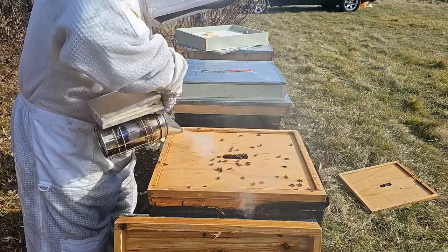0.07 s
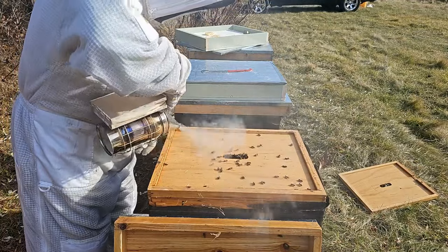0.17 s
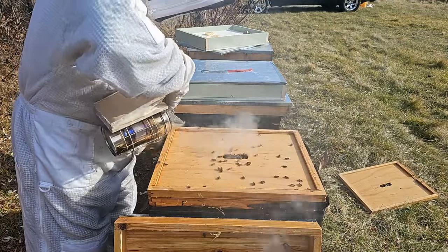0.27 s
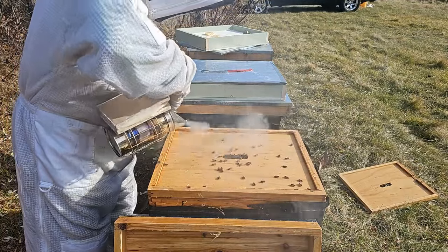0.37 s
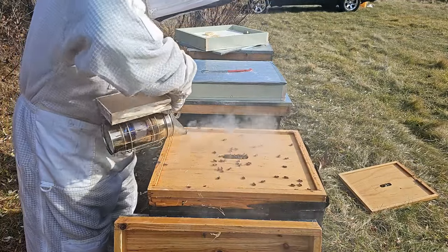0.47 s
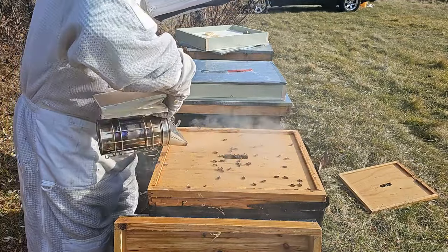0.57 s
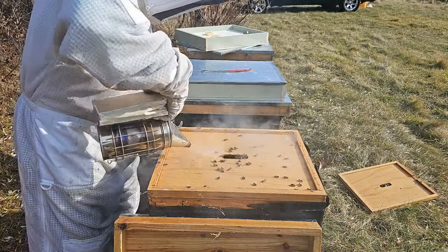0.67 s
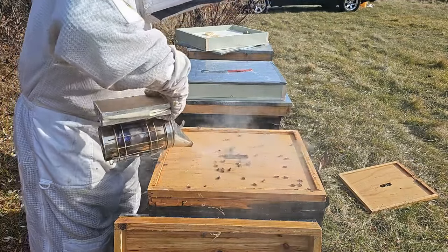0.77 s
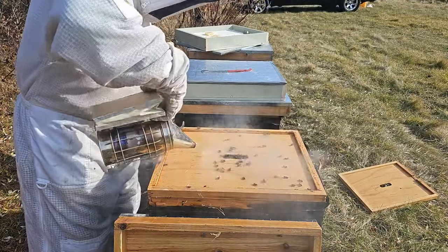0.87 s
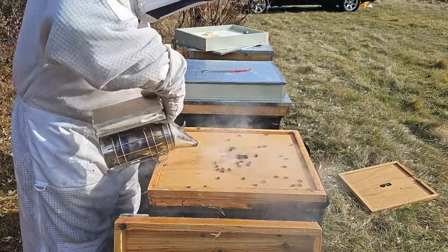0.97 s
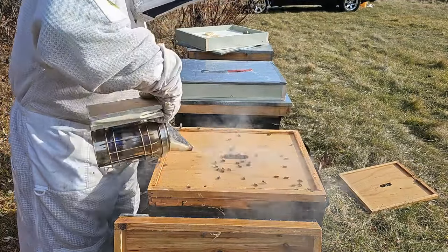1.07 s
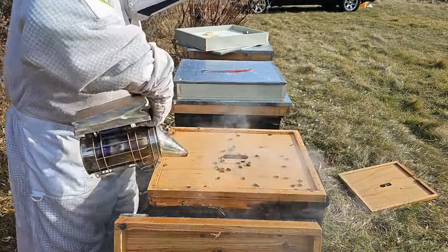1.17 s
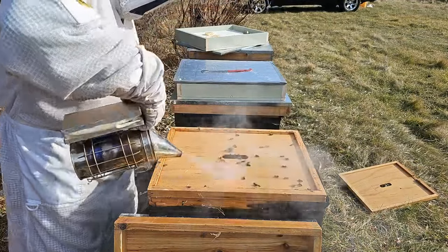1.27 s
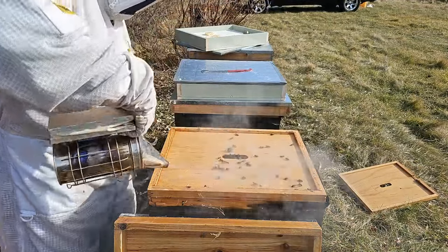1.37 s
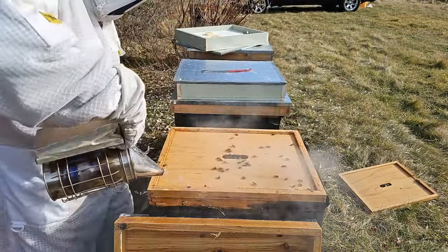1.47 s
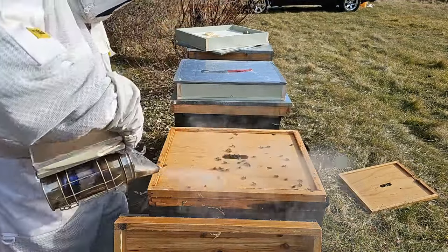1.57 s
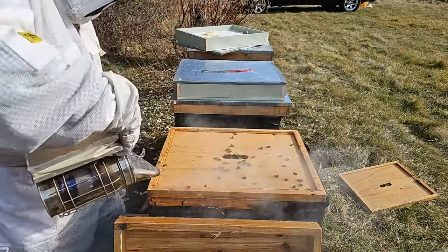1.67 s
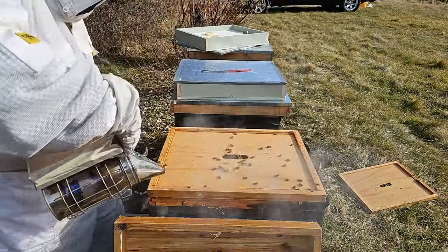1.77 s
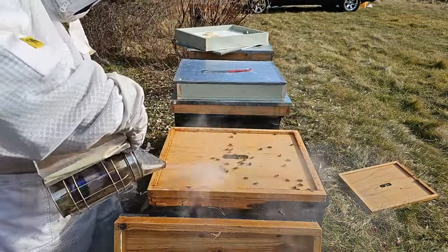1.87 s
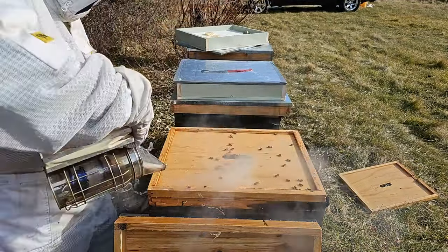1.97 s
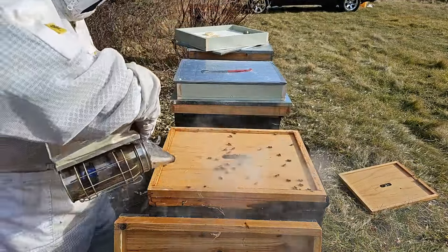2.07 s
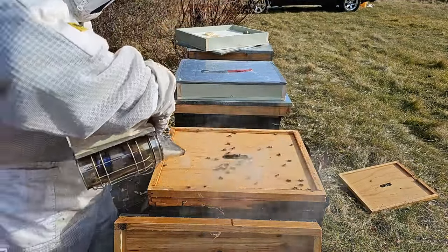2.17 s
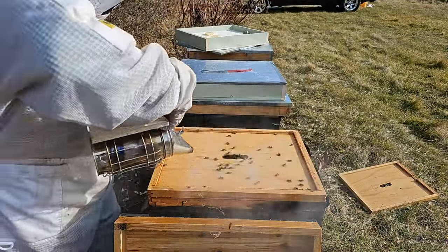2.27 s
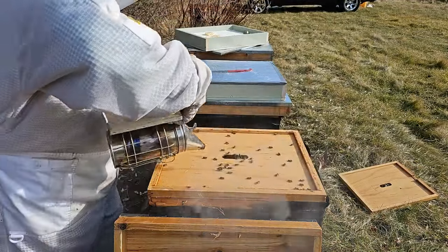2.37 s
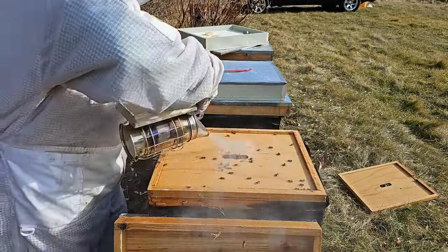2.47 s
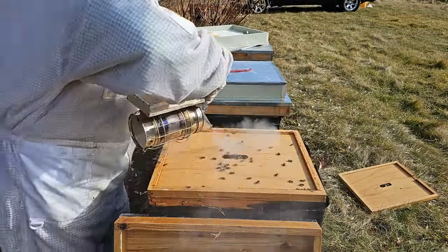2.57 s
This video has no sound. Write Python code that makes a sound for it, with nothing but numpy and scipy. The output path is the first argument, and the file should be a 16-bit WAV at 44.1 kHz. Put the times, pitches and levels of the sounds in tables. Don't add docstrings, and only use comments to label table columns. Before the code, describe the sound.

Bee smoker bellows pumped seven times, breathy rough puffs with wheezing air drawn back, outdoors

```python
import sys
import numpy as np
from scipy import signal
from scipy.fft import rfft, irfft
from scipy.io import wavfile
from scipy.ndimage import uniform_filter1d, minimum_filter1d

SR = 44100
rng = np.random.default_rng(int(sys.argv[2]) if len(sys.argv) > 2 else 0)


def amplitude_ratio(level_db):
    exponent = np.asarray(level_db, float) / 20
    return 10 ** exponent


def unload_wav(signal):
    wavfile.write(
        sys.argv[1],
        SR,
        np.round(np.clip(np.atleast_2d(signal).T, -1, 1) * 32767).astype(np.int16),
    )


N = 114660
TIME_S = np.arange(N) / SR
BIN_HZ = np.arange(N // 2 + 1) * SR / N

# start_s, length_s, jet_db, bright_jet_db, hiss_db
SQUEEZES = [
    (0.219, 0.17, -15, -18.5, -43),
    (0.552, .14, -11.5, -20, -41),
    (0.851, 0.15, -16, -25, -41.5),
    (1.15, 0.13, -16, -25, -41.5),
    (1.431, 0.13, -19, -27, -44.5),
    (1.716, 0.12, -14.5, -23, -42.5),
    (2.025, 0.13, -14, -21.5, -39),
]


def drift(rate_hz):
    r = np.exp(-2 * np.pi * rate_hz / SR)
    slow = signal.lfilter([1], [1, -2 * r, r * r], rng.standard_normal(N + SR))[SR:]
    return slow / slow.std()


def coloured(spectrum, flicker_db, rate_hz):
    hz = np.maximum(BIN_HZ, 1)
    f, db = np.transpose(spectrum)
    inside = (hz > f[0]) & (hz < f[-1])
    gain = amplitude_ratio(np.interp(np.log(hz), np.log(f), db)) * inside
    whole = rfft(rng.standard_normal(N)) * gain
    band = 2 * np.log2(hz / f[0])
    shared = drift(rate_hz)
    out = 0
    for k in range(int(2 * np.log2(f[-1] / f[0])) + 2):
        part = irfft(whole * np.clip(1 - abs(band - k), 0, 1), N)
        out = out + part * amplitude_ratio(flicker_db * (0.23 * shared + 1.5 * drift(rate_hz)))
    return out / out.std()


def hump(start_s, length_s, rise_s, fall_s):
    t = TIME_S - start_s
    return np.sin(np.pi / 2 * np.clip(np.minimum(t / rise_s, (length_s - t) / fall_s), 0, 1)) ** 2


def linger(swell, tail_db, t60_s):
    r = amplitude_ratio(-60 / (t60_s * SR))
    return np.maximum(swell, amplitude_ratio(tail_db) * signal.lfilter([1 - r], [1, -r], swell))


def ring(x, hz, width_hz):
    r = np.exp(-np.pi * width_hz / SR)
    poles = [1, -2 * r * np.cos(2 * np.pi * hz / SR), r * r]
    return signal.lfilter([(1 - r * r) / 2, 0, (r * r - 1) / 2], poles, x + 1e-18)


def tilted(x, db_per_octave, pivot_hz):
    octaves = np.log2(np.maximum(BIN_HZ, 100) / pivot_hz)
    return irfft(rfft(x) * amplitude_ratio(db_per_octave * octaves), N)


def field():
    # hz, db_per_hz
    field_spectrum = [(30, -42), (70, -31.5), (125, 3), (357, -9.5), (900, -10), (1800, -19.5),
                      (2700, -32.5), (7300, -44)]
    # time_s, level_db
    field_level = [(0, -37), (.5, -44.5), (1.0, -46), (2.0, -42.5), (2.55, -45), (2.6, -43)]
    s, db = np.transpose(field_level)
    return amplitude_ratio(np.interp(TIME_S, s, db)) * coloured(field_spectrum, flicker_db=1.1, rate_hz=9.8)


def wheeze():
    # hz, db_per_hz
    wheeze_spectrum = [(350, -17), (700, -25.5), (950, -5), (1700, 0), (2400, -9.5), (3600, -15),
                       (4200, -25), (7400, -37)]
    # start_s, length_s, level_db, brightness_db_per_octave
    refills = [
        (-.02, 0.5, -48.5, 1.1),
        (0.345, 0.22, -46, 2.5),
        (0.669, 0.18, -38.5, -1.5),
        (0.994, 0.082, -38, -4),
        (1.253, 0.095, -40, -1.1),
        (1.522, 0.18, -37, -1.8),
        (1.813, 0.14, -39.5, -3.7),
        (2.133, 0.11, -33, -4.5),
        (2.231, 0.15, -46.5, -0.5),
        (2.47, 0.16, -50, -1.5),
    ]
    rise_s, fall_s = 0.01, 0.045
    air = coloured(wheeze_spectrum, flicker_db=5.0, rate_hz=11)
    out = np.zeros(N)
    for s, d, db, bright_db in refills:
        out += amplitude_ratio(db) * hump(s, d, rise_s, fall_s) * tilted(air, bright_db, pivot_hz=1300)
    return out


def whistles():
    # start_s, length_s, pitch_hz, width_hz
    whistle_tones = [(.04, .14, 1780, 90), (.08, .1, 950, 70), (.46, .11, 1880, 50), (.43, .14, 1600, 90),
                     (.43, .1, 1330, 70), (.42, .12, 3100, 500), (.42, .1, 2340, 100),
                     (.70, .13, 1460, 320), (.73, .135, 1820, 60), (.72, .09, 2360, 120),
                     (.71, .11, 3300, 400), (1.0, .125, 1320, 250), (1.02, .11, 870, 40),
                     (1.0, .13, 6200, 700), (1.02, .07, 2700, 300), (1.285, .115, 1300, 200),
                     (1.355, .055, 2650, 40), (1.28, .085, 6100, 600), (1.545, .065, 285, 45),
                     (1.55, .165, 533, 35), (1.565, .155, 867, 25), (1.575, .125, 1350, 90),
                     (1.595, .115, 1750, 45), (1.565, .065, 2650, 60), (1.6, .09, 3200, 400),
                     (1.865, .085, 1820, 120), (1.89, .09, 2300, 100), (2.2, .125, 1720, 80),
                     (2.235, .08, 3800, 500), (2.49, .085, 3400, 150)]
    whistle_db = [-50, -45, -42.5, -45, -45.5, -56, -62, -40.5, -51.5, -45.5, -53, -41.5, -45.5, -60, -52.5,
                  -40, -58, -63.5, -38.5, -34.5, -41, -41, -44, -42.5, -61, -43, -53, -46.5, -55.5, -64]
    rise_s, fall_s = 0.031, 0.036
    out = np.zeros(N)
    for (s, d, hz, width_hz), db in zip(whistle_tones, whistle_db):
        tone = ring(ring(rng.standard_normal(N), hz, width_hz), hz, 2 * width_hz)
        tone = tone / uniform_filter1d(tone ** 2, size=1300) ** .3
        out += amplitude_ratio(db) * hump(s, d, rise_s, fall_s) * tone / tone.std()
    return out


def spout():
    # hz, db_per_hz
    jet_spectrum = [(440, -37), (750, -9.5), (965, -8), (1050, -1.5), (1200, 3), (1420, 3.5), (2200, -15),
                    (2860, -50), (4840, -120)]
    bright_spectrum = [(1400, -14.5), (1900, -4), (2300, -4), (2900, -10), (3900, -19), (4400, -28),
                       (4700, -44)]
    hiss_spectrum = [(4000, -20), (4500, -10), (5000, 7.5), (6500, 5.5), (7100, -8.5), (7500, -29)]
    rise_s, fall_s = 0.05, .038
    jet_power, bright_power, hiss_power = 1.09, 1.8, 1.9
    peak_share = 0.5
    hiss_lag_s, treble_flicker_db = .008, 1.1
    jet, bright, hiss = np.zeros((3, N))
    for s, d, jet_db, bright_db, hiss_db in SQUEEZES:
        pressure = hump(s, d, peak_share * d, (1 - peak_share) * d) ** .5
        jet += amplitude_ratio(jet_db) * hump(s, d, rise_s, fall_s) ** jet_power
        bright += amplitude_ratio(bright_db) * pressure ** bright_power
        hiss += amplitude_ratio(hiss_db) * pressure ** hiss_power
    hiss = linger(np.roll(hiss, int(hiss_lag_s * SR)), tail_db=-14, t60_s=0.32)
    return (jet * coloured(jet_spectrum, flicker_db=-1.0, rate_hz=40)
            + bright * coloured(bright_spectrum, treble_flicker_db, rate_hz=35)
            + hiss * coloured(hiss_spectrum, treble_flicker_db, rate_hz=72))


def can_boom():
    # hz, db_per_hz
    boom_spectrum = [(35, -74), (60, -68), (127, -3.5), (189, 6), (318, 2.5), (617, -5.5), (702, -8),
                     (800, -12), (1040, -10), (1760, -120)]
    # level_db, brightness_db_per_octave
    booms = [
        (-14, -2),
        (-15.5, -0.5),
        (-15.5, -3),
        (-18, 0.13),
        (-15.5, -1.5),
        (-16.5, -0.5),
        (-16.5, -0.7),
    ]
    lead_s, rise_s, fall_s = 0.011, 0.059, 0.046
    air = coloured(boom_spectrum, flicker_db=2.0, rate_hz=14)
    out = np.zeros(N)
    for (s, d, *_), (db, bright_db) in zip(SQUEEZES, booms):
        swell = hump(s - lead_s, d + 2 * lead_s, rise_s, fall_s)
        swell = linger(swell, tail_db=-6, t60_s=0.22)
        out += amplitude_ratio(db) * tilted(air, bright_db, pivot_hz=200) * swell
    return out


def can_thumps():
    # start_s, level_db, pitch_hz
    thumps = [
        (.214, -17, 190),
        (.566, -2, 200),
        (.848, -13, 185),
        (1.142, -15, 190),
        (1.422, -18, 185),
        (1.706, -18, 200),
        (2.02, -18, 200),
    ]
    rise_s, t60_s = .009, .1
    out = np.zeros(N)
    for s, db, hz in thumps:
        age_s = np.clip(TIME_S - s, 0, 1)
        decay = amplitude_ratio(db - 60 * age_s / t60_s)
        out += decay * np.minimum(age_s / rise_s, 1) * np.sin(2 * np.pi * hz * age_s)
    return out


def scene():
    return (field() + wheeze() + whistles() + spout() + can_boom() + can_thumps())[None]


def band_limit(x):
    return signal.sosfilt(signal.butter(12, 7750, fs=SR, output="sos"), x)


def record(dry):
    limit_db, release_db_per_s, ceiling = -7, 600, .53
    drop_above_hz, drop_share, drop_block = 6300, .2, 160
    dry = signal.sosfilt(signal.butter(2, 95, "high", fs=SR, output="sos"), dry)

    level_db = 20 * np.log10(abs(dry) + 1e-9)
    slope_db = release_db_per_s * TIME_S
    held_db = np.maximum.accumulate(level_db + slope_db, axis=1) - slope_db
    cut_db = -minimum_filter1d(-np.maximum(held_db - limit_db, 0), size=41)
    x = dry * amplitude_ratio(-.7 * uniform_filter1d(cut_db, size=41))
    x = x / (1 + abs(x / ceiling) ** 8) ** (1 / 8)

    top = irfft(rfft(x) * (BIN_HZ > drop_above_hz), N)
    lost = np.repeat(rng.random(N // drop_block + 1) < drop_share, drop_block)[:N]
    x = x - uniform_filter1d(lost * 1., size=60) * top
    x = signal.sosfilt(signal.cheby2(12, 70, 6980 * 1.422, fs=SR, output="sos"), x)
    x = signal.sosfilt(signal.butter(2, 72, "high", fs=SR, output="sos"), x)
    return band_limit(x)


dry = scene()
out = record(dry)
unload_wav(out)
```